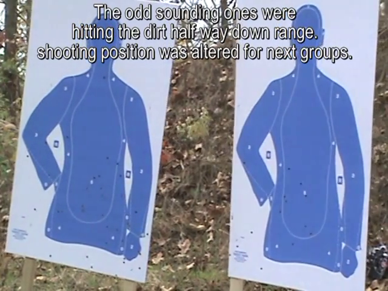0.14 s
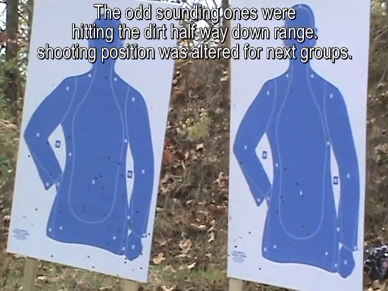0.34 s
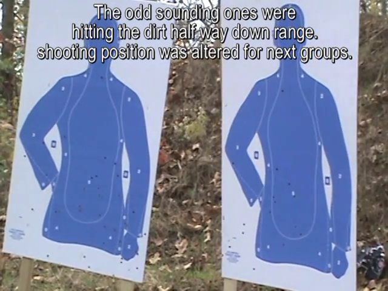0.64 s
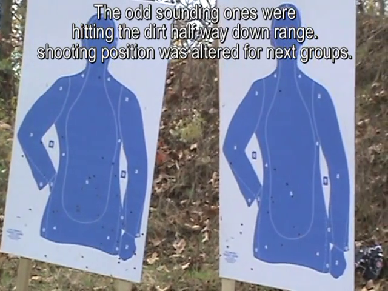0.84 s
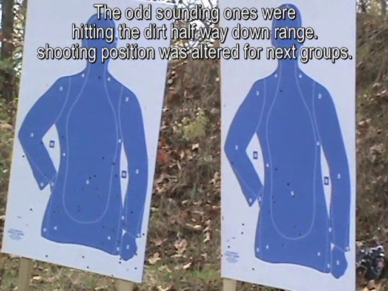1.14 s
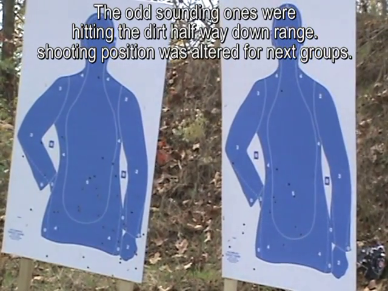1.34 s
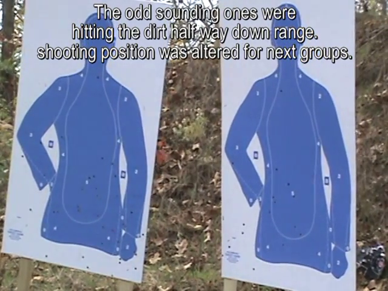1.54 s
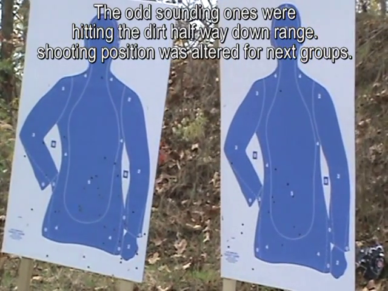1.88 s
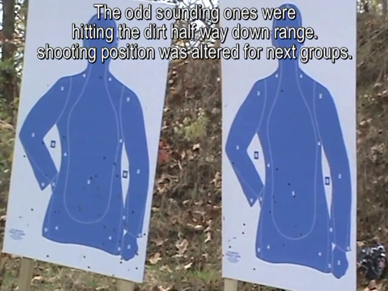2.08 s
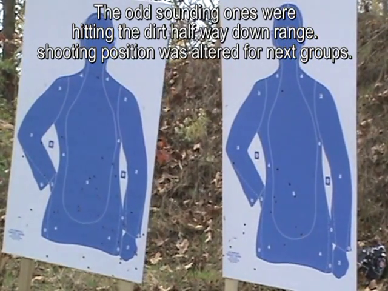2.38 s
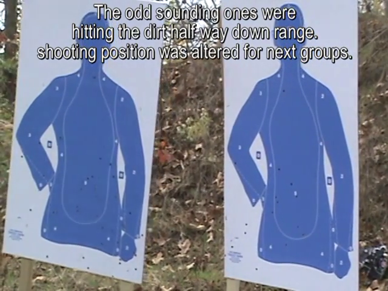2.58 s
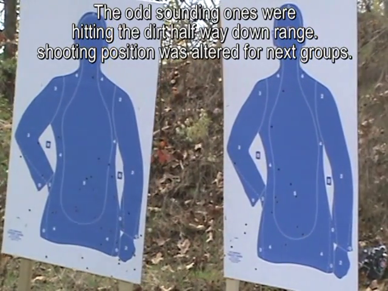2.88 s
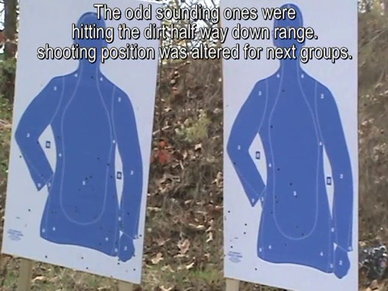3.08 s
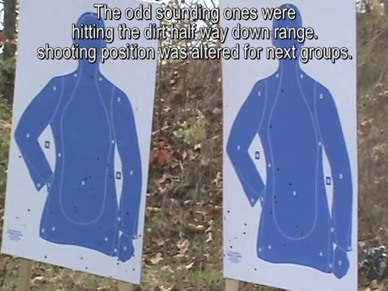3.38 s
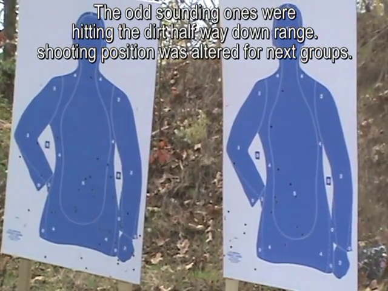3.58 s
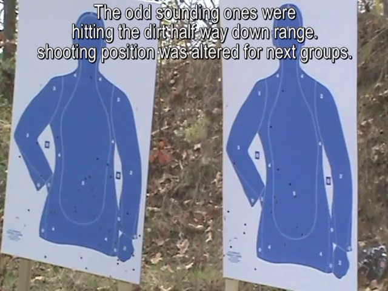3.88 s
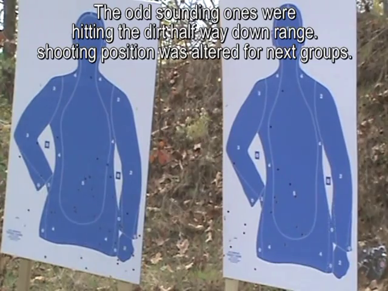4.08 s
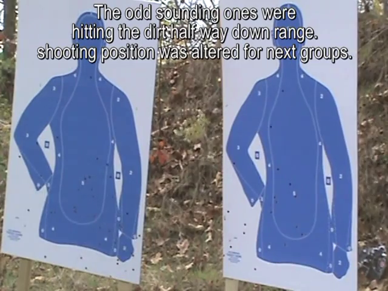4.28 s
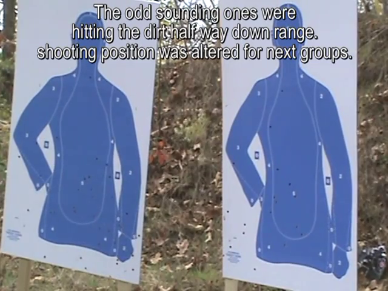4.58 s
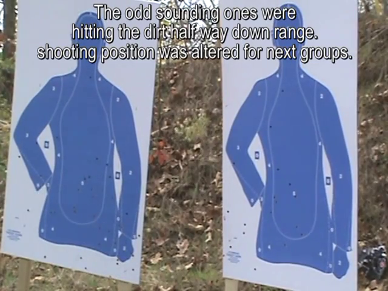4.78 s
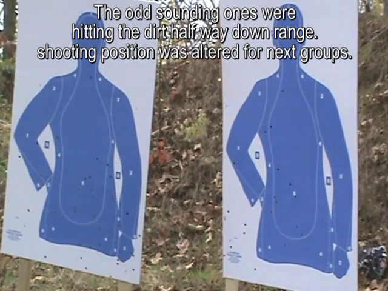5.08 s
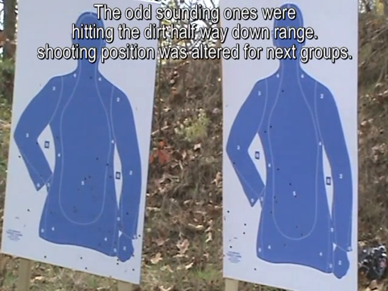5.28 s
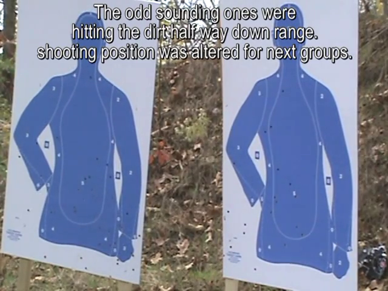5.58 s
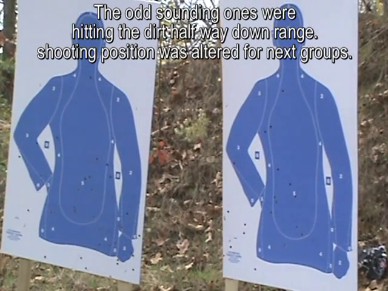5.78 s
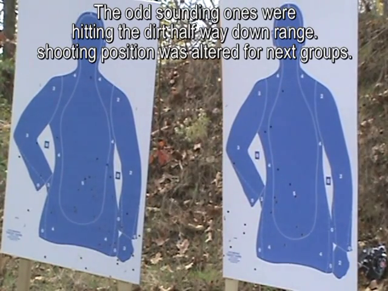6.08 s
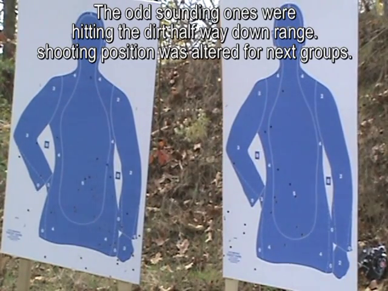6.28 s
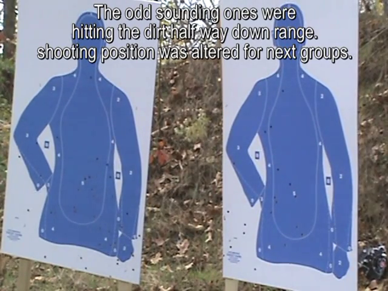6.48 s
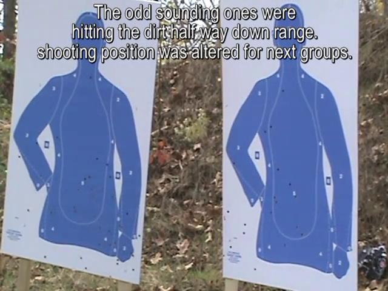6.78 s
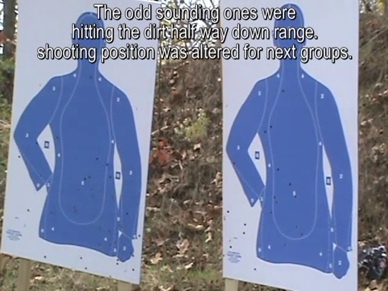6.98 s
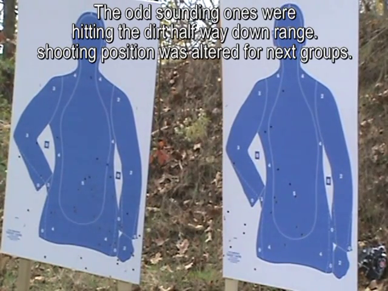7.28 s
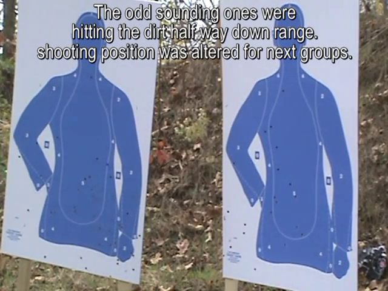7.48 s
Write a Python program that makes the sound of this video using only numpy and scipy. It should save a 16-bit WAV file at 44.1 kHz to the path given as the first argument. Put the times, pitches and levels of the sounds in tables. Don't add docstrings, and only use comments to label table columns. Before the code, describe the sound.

Overloaded supersonic cracks in quick threes, each trailed by a low distant gun thud, roll away through trees between stretches of breeze, wind rumble and leaf rustle.

```python
import sys
import numpy as np
from scipy import signal
from scipy.fft import rfft, irfft
from scipy.io import wavfile
from scipy.ndimage import uniform_filter1d

SR = 44100
rng = np.random.default_rng(int(sys.argv[2]) if len(sys.argv) > 2 else 0)


def transcribe(u):
    v = np.clip(np.atleast_2d(u).T, -1, 1)
    q = np.round(v * 32767).astype(np.int16)
    wavfile.write(sys.argv[1], SR, q)


def nominal_scale(level):
    x = np.asarray(level, float) / 20
    return 10 ** x


N = 337365
HZ = np.fft.rfftfreq(512, 1 / SR)
TIMES = np.arange(N // 128 + 4) * 128 / SR

# pitch_hz, level_db (per Hz)
RUSTLE_COLOUR = [(120, -34), (200, -6.5), (339, -5.5), (446, -1.5), (534, -7), (641, -6), (3420, -12.5),
                 (4410, -14), (15500, -34)]
# pitch_hz, level_db (per Hz)
LITTER_COLOUR = [(4710, -10), (8000, -1), (11000, -3), (15100, -14), (16000, -12)]
# last_blast_s, level_db, stays_up_s, fade_db_per_s
STIRRED_LITTER = [
    (.79, -51, .75, -22),
    (3.28, -51, .5, -40),
    (5.53, -52, 0.11, -88),
]
# start_s, level_db
TWIG_TICKS = [(2.5594, -52), (6.2053, -35), (6.4694, -48.5), (6.559, -57), (6.629, -40), (6.8867, -36)]
# pitch_hz, side_minus_mid_db
CANOPY_WIDTH = [(60, -9), (180, -42), (550, -18), (1650, -10), (4970, -8), (15000, -6)]
# pitch_hz, side_minus_mid_db
ECHO_WIDTH = [(60, 0), (150, -13), (380, -18), (950, -10), (2380, -9), (5980, -7), (15000, -6.5)]
# pitch_hz, left_minus_right_db
BALANCE = [(60, 0.5), (240, -2.5), (950, 0.5), (3770, 1.5), (15000, -1.5)]
RUSTLE_DB, CALMING_DB_PER_S = -41.5, -0.7
FAR_DB, FAR_DB_PER_S = -27, -25
FIZZ_DB, SETTLING_DB_PER_S = -65, -3

# time_s, rumble_db
STEADY_WIND = [(0, -31.5), (.25, -34.5), (.42, -21), (1.3, -40.5), (1.6, -37.5), (2.3, -41), (2.46, -44),
               (2.9, -45), (3.9, -47), (4.27, -39.5), (4.32, -31), (4.74, -29), (5.17, -28), (5.7, -31.5),
               (6.1, -40), (6.6, -46.5), (7.3, -49), (7.65, -45)]
# centre_s, lift_db, half_length_s
WIND_GUSTS = [(0.108, 4, 0.067), (0.384, -3, 0.017), (1.46, 9, 0.026), (1.699, 8, 0.023),
              (1.796, 7, 0.0083), (1.895, 1, 0.0094), (2.013, 6.5, 0.013), (2.24, 7.5, 0.053),
              (2.311, 13, 0.0069), (2.532, 11.5, 0.022), (2.578, 15, 0.013), (2.671, 11.5, 0.039),
              (2.77, 4, .03), (3.93, 6.5, 0.09), (4.206, 2, 0.025), (4.346, 3, .03), (4.429, 3, .02),
              (4.813, 6.5, 0.038), (5.147, 5, 0.035), (4.55, 4, 0.016), (5.665, 16, 0.029),
              (5.73, 17, 0.02), (5.978, 16, 0.014), (6.55, 5, .03), (6.694, 4, 0.017), (6.21, 0, 0.021),
              (6.9, 3, 0.018), (7.424, 10, 0.014)]
# pitch_hz, level_db (per Hz)
RUMBLE_COLOUR = [(12, -42.5), (20, -7), (58, 0.5), (97, 1), (195, -5), (255, -8), (377, -19), (500, -29.5),
                 (650, -53.5), (1100, -120)]
# pitch_hz, level_db (per Hz)
BUFFET_COLOUR = [(150, -25), (300, -3), (550, -1.5), (900, -20), (1400, -30), (2500, -88)]
BUFFET_DB = -49.5
BUFFET_PER_WIND, BUFFET_PER_GUST = 1.5, 1.6

# start_s, crack_db, deafness_after_db, swing_left, swing_right (diaphragms)
BULLETS = [(0.4335, 2.9, -31, -.3, 0.29), (0.5549, 7.1, 10, 0.2, -0.086), (.6690, 8.3, -2.5, -0.45, -0.2),
           (2.9213, 0.85, -3, 0.083, -0.28), (3.0418, 8.6, -0.5, -0.49, -0.29),
           (3.1580, 8.1, -25, -0.2, -0.94), (5.1841, 6.3, -1, -0.54, 0.15), (5.3020, 4.5, -15, -2.4, -0.5),
           (5.4150, 9, -2.5, 0.99, -0.28), (7.5360, 0.43, -24, 1, -0.97), (7.6475, 12.6, -10, -2.3, -0.2)]
# delay_s, length_s, level_db, shock_length_s, treble_limit_hz
CRACK_PATHS = [
    (0, 0.0029, -3, 0.000257, 15000),
    (.0078, 0.006, -4.5, 0.000119, 13700),
    (0.017, 0.0042, -4.5, 0.00017, 15000),
    (0.024, .0020, -3, 0.00021, 5000),
    (.0680, 0.0029, -7, 0.00038, 3580),
    (.097, 0.0023, -11.5, .0004, 2600),
]
# start_s, level_db, first_front_left_share, first_front_right_share, echo_db
MUZZLE_BLASTS = [(0.5513, -1.5, 1, 0.46, 0), (0.6722, -2.5, 1, 0.81, 0), (0.7875, 1, 0.15, 0.89, 0.072),
                 (3.0410, -2, 0.91, 1, 0.0017), (3.1554, -4, 1, 0.19, 0), (3.2767, 5, 0.63, 0.62, 0.96),
                 (5.3015, -4.5, 0.5, 0.9, 0.024), (5.419, -1.5, 0.88, 0.45, 1), (5.5307, 7.5, 1, 0.32, 1),
                 (7.6472, -4, 0.37, 0.89, 0.21)]
# delay_s, decay_s, pressure
BLAST_FRONTS = [
    (0, 0.0015, -1.25),
    (.0018, .0010, 4),
    (.0025, 0.0011, -2),
    (.0036, 0.00085, 3.5),
    (.0043, .0016, -2),
]
# age_s, level_db
BRUSH_FADE = [(0, -43), (.005, -3), (.009, -28.5), (0.015, -0.5), (0.023, -4), (.045, -6.5), (.09, -23),
              (.2, -47)]
# pitch_hz, level_db (per Hz)
BRUSH_TONE = [(350, -45), (600, -51), (1730, -2.5), (3580, -30), (3940, 4), (5560, 6.5), (16000, -11)]
# age_s, level_db
CRACK_FADE = [(0, -46), (.008, -23.5), (.03, -4.5), (.1, -5.5), (.25, -8.5), (0.501, -14.5), (0.802, -30),
              (1.3, -47), (2, -88.5)]
# pitch_hz, level_db (per Hz)
CRACK_TONE = [(88, -63), (150, -41), (201, -26), (745, -14), (871, -10), (1600, -3), (2870, 0.5),
              (9630, -11), (14200, -28), (16000, -45)]
# age_s, level_db
BLAST_FADE = [(0, -6), (.05, -13.5), (.15, -7.5), (.3, -12.5), (0.499, -26), (.8, -43.5), (1.3, -88),
              (2, -88)]
# pitch_hz, level_db (per Hz)
BLAST_TONE = [(24, -52), (40, -18), (124, -3), (301, -3.5), (530, -11), (1170, -8), (1840, -9), (2770, -11),
              (4070, -12), (9000, -25), (11700, -67), (19800, -120)]
# pitch_hz, extra_loss_db_per_s
AIR_LOSS = [(100, 4.5), (1000, 1), (3000, 17), (6000, 40.5), (10000, 80.5), (16000, 127.5)]
ECHO_PER_CRACK = 0.19

# delay_s, length_s
CAPSULE_LURCHES = [
    (0, 0.0027),
    (.0078, 0.0046),
]
LURCH, LURCH_HZ = 0.44, 1000
# start_s, end_s, up_to_hz
NARROW_SPANS = [(0.45, 0.534, 2180), (0.598, 0.662, 1510), (2.965, 3.014, 1800), (3.169, 3.28, 2580),
                (5.437, 5.528, 2400), (7.555, 7.64, 2580)]


def evened(x):
    return x / np.sqrt(np.mean(x ** 2) + 1e-20)


def read(points, hz):
    f, value = np.transpose(points)
    return np.interp(np.log(hz + 1), np.log(f + 1), value)


def colour(points):
    return evened(nominal_scale(read(points, HZ)))


def add(mix, s, sound):
    part = mix[..., round(s * SR):][..., :sound.shape[-1]]
    part += sound[..., :part.shape[-1]]


def hiss(gain, grain_db, width):
    grains = nominal_scale(grain_db * np.minimum(rng.exponential(1, N), 4))
    noises = rng.standard_normal((2, N)) * grains
    mid, side = (signal.stft(evened(v), nperseg=512, noverlap=384)[2] for v in noises)
    side = side * nominal_scale(read(width, HZ))[:, None]
    z = np.array([mid + side, mid - side]) * gain.T[:, :mid.shape[1]]
    z *= nominal_scale(np.outer([.5, -.5], read(BALANCE, HZ)))[:, :, None]
    return signal.istft(z, nperseg=512, noverlap=384)[1][:, :N]


def drift(size):
    patches = rng.standard_normal((len(TIMES), len(HZ)))
    patches = uniform_filter1d(patches, size, 0)
    return evened(uniform_filter1d(patches, size, 1))


def leaves():
    rustle = nominal_scale(RUSTLE_DB + CALMING_DB_PER_S * TIMES) ** 2
    fizz = nominal_scale(FIZZ_DB + SETTLING_DB_PER_S * TIMES) ** 2
    for s, db, hold, fade_db in STIRRED_LITTER:
        age = TIMES - s
        rustle = rustle + (age > 0) * nominal_scale(FAR_DB + FAR_DB_PER_S * np.abs(age)) ** 2
        fizz = fizz + (age > 0) * nominal_scale(db + fade_db * np.maximum(age - hold, 0)) ** 2
    treble_loss = nominal_scale(-1.3 * np.maximum(HZ / 1000 - 7.5, 0))
    power = rustle[:, None] * (colour(RUSTLE_COLOUR) * treble_loss) ** 2
    power = power + fizz[:, None] * colour(LITTER_COLOUR) ** 2
    out = hiss(np.sqrt(power) * nominal_scale(0.65 * drift(size=14)), 2.1, CANOPY_WIDTH)
    t = np.arange(300) / SR
    for s, db in TWIG_TICKS:
        tick = np.diff(rng.standard_normal((2, 302)), 2) * np.exp(-t / 0.0026)
        add(out, s, nominal_scale(db - 2.5) * tick / np.abs(tick).max())
    return out


def wind():
    hz, t = np.fft.rfftfreq(N, 1 / SR), np.arange(N) / SR
    steady_db = np.interp(TIMES, *np.transpose(STEADY_WIND))
    gust_db = sum(db * np.exp(-((TIMES - s) / half) ** 2) for s, db, half in WIND_GUSTS)
    buffet_db = BUFFET_DB + BUFFET_PER_WIND * (steady_db + 29) + BUFFET_PER_GUST * gust_db
    rumble_db = np.interp(t, TIMES, steady_db + gust_db)
    buffet_db = np.interp(t, TIMES, buffet_db)
    rumble_side_db = -0.5 + 0.63 * np.minimum(rumble_db + 32.5, 0)
    layers = ((RUMBLE_COLOUR, rumble_db, rumble_side_db), (BUFFET_COLOUR, buffet_db, 4))
    out = np.zeros((2, N))
    for spectrum, level_db, side_db in layers:
        gain = nominal_scale(read(spectrum, hz))
        mid, side = (evened(irfft(rfft(v) * gain, N)) for v in rng.standard_normal((2, N)))
        out += nominal_scale(level_db) * (mid + np.outer([1, -1], nominal_scale(side_db) * side))
    lumps = evened(signal.lfilter(*signal.butter(1, 25, fs=SR), rng.standard_normal(N)))
    return out * nominal_scale(2.24 * lumps)


def echo(events, profile, spectrum, crest_db=0):
    power = np.zeros((len(TIMES), len(HZ)))
    for row in events:
        age = TIMES - row[0]
        live = (age > 0) & (age < profile[-1][0])
        age = age[live, None]
        crest_hz = 2700 + 3300 * np.exp(-age / 0.053)
        crest = crest_db * np.exp(-(np.log((HZ + 1) / crest_hz) / 0.32) ** 2 - age / 0.049)
        fade_db = np.interp(age, *np.transpose(profile)) - age * read(AIR_LOSS, HZ)
        power[live] += nominal_scale(2 * (row[-1] + fade_db + crest))
    return power * colour(spectrum) ** 2


def woods():
    passes = [(s, ECHO_PER_CRACK * db) for s, db, *_ in BULLETS]
    power = echo(passes, BRUSH_FADE, BRUSH_TONE)
    power += echo(passes, CRACK_FADE, CRACK_TONE, crest_db=13)
    power += echo(MUZZLE_BLASTS, BLAST_FADE, BLAST_TONE)
    clumps = evened(uniform_filter1d(rng.standard_normal(len(TIMES)), size=2))[:, None]
    return hiss(np.sqrt(power) * nominal_scale(0.88 * clumps + 0.8 * drift(size=9)), 1.5, ECHO_WIDTH)


def blasts():
    t = np.arange(0, .03, 1 / SR)
    fronts = np.array([pressure * np.exp(-np.maximum(t - delay, 0) / decay) * (t >= delay)
                       for delay, decay, pressure in BLAST_FRONTS])
    fronts[-1] += 0.23 * np.sin(np.pi * np.clip((t - .006) / 0.0065, 0, 1))
    fronts = signal.lfilter(*signal.butter(2, 3000, fs=SR), fronts)
    first_front = fronts[1:3].sum(0)
    out = np.zeros((2, N))
    for s, db, left, right, _ in MUZZLE_BLASTS:
        missing = np.outer([1 - left, 1 - right], first_front)
        add(out, s, nominal_scale(db) * (fronts.sum(0) - missing))
    return out


def cracks():
    out, t = np.zeros((2, N)), np.arange(-.002, .02, 1 / SR)
    for s, db, *_ in BULLETS:
        for delay, length, loss_db, shock_s, hz in CRACK_PATHS:
            u = np.arange(64) / SR / shock_s
            n_wave = (1 - 2 * u) * (u <= 1)
            rise = 0.026 * np.exp(t / 0.00038)
            fall = np.exp(-(t / length) ** 3) + 0.17 * np.exp(-t / 0.0052)
            shape = np.where(t < 0, rise, fall)
            spray = rng.standard_normal((3, len(t))) * (rng.random((3, len(t))) < .4)
            spray = spray[:2] + 1.16 * spray[2]
            shocks = signal.oaconvolve(spray, [n_wave])[:, :len(t)]
            shocks = signal.lfilter(*signal.butter(3, hz, fs=SR), shocks)
            add(out, s + delay - .002, nominal_scale(db + loss_db) * evened(shocks) * shape)
    return out


def scene():
    smother_db, cut_db, t = np.zeros(N), np.zeros(N), np.arange(0, 1, 1 / SR)
    for s, *_ in MUZZLE_BLASTS:
        add(smother_db, s, -9 * (t < .006) - 5.2 * np.exp(-t / 0.041))
    for s, *_ in BULLETS:
        add(cut_db, s, -12 * np.exp(-t / 0.051))
    background = leaves() + wind() * nominal_scale(cut_db)
    return background + woods() * nominal_scale(smother_db) + blasts() + cracks()


def overload():
    deaf_db, swing, t = np.zeros(N), np.zeros((2, N)), np.arange(0, .04, 1 / SR)
    for s, _, db, left, right in BULLETS:
        add(deaf_db, s + 0.003, db * np.clip(t / 0.00029, 0, 1) * (t < .0044))
        add(deaf_db, s + .0218, -5 * np.exp(-t / 0.0088))
        swing_back = np.exp(-t / 0.002) * np.cos(2 * np.pi * 90 * t)
        add(swing, s + 0.0034, np.outer([left, right], swing_back))
        for delay, length in CAPSULE_LURCHES:
            flips = rng.standard_normal((2, len(t)))
            flips = signal.lfilter(*signal.butter(2, LURCH_HZ, fs=SR), flips)[:, ::-1]
            add(swing, s + delay, LURCH * np.tanh(3 * evened(flips)) * np.exp(-(t / length) ** 6))
        hz = rng.uniform(37, 95, (2, 1))
        add(swing, s + .0082, 0.5 * np.exp(-t / 0.0058) * np.cos(2 * np.pi * hz * t))
        flutter = rng.standard_normal((2, len(t)))
        flutter = signal.lfilter(*signal.butter(2, [50, 600], "band", fs=SR), flutter)
        add(swing, s + 0.00774, nominal_scale(-18.5) * evened(flutter) * np.exp(-(t / 0.018) ** 4))
    return nominal_scale(deaf_db), swing


def narrow(x):
    side, t = .5 * (x[0] - x[1]), np.arange(N) / SR
    for start, end, hz in NARROW_SPANS:
        span = slice(round((start - .02) * SR), round((end + .02) * SR))
        band = signal.butter(6, [90, hz], "band", fs=SR, output="sos")
        low = signal.sosfiltfilt(band, side[span])
        inside = np.minimum(t[span] - start, end - t[span])
        side[span] -= low * np.clip(inside / 0.0068 + 1, 0, 1)
    return x.mean(0) + np.outer([1, -1], side)


def top_cut(x):
    return signal.sosfilt(signal.butter(12, 16160, fs=SR, output="sos"), x)


def record(dry):
    power = signal.lfilter([.002], [1, -.998], (dry ** 2).mean(0))
    power_db = 10 * np.log10(power + 1e-12)
    fall = np.arange(N) * 26.2 / SR
    held_db = np.maximum.accumulate(power_db + fall) - fall
    over_db = np.maximum(held_db + 21, 0)
    deaf, swing = overload()
    squeezed = dry * deaf / nominal_scale(0.43 * signal.lfilter([.003], [1, -.997], over_db))
    clipped = np.clip(nominal_scale(0.5) * squeezed + swing, -.98, .98)
    return top_cut(narrow(clipped))


dry = scene()
out = record(dry)
transcribe(out)
```